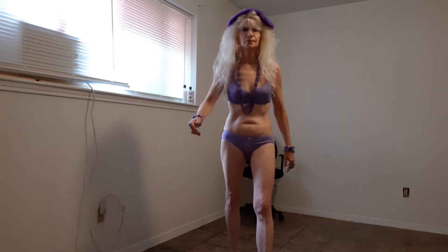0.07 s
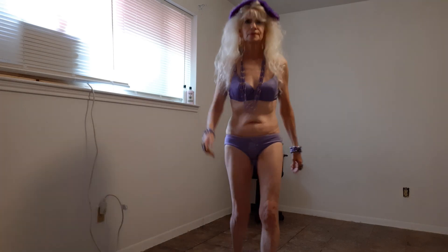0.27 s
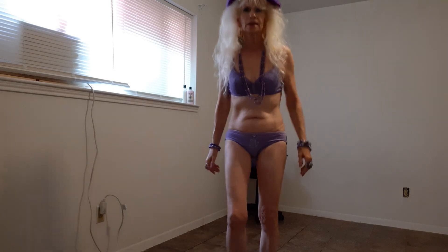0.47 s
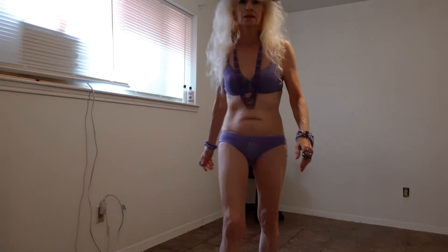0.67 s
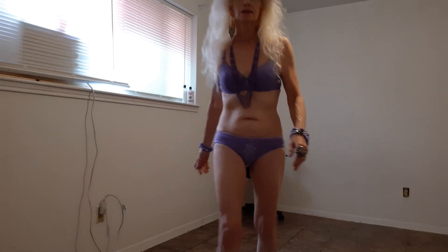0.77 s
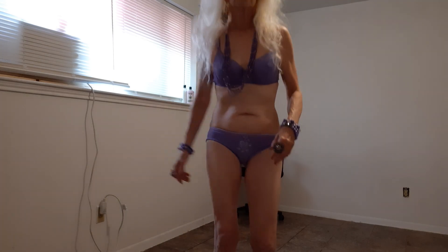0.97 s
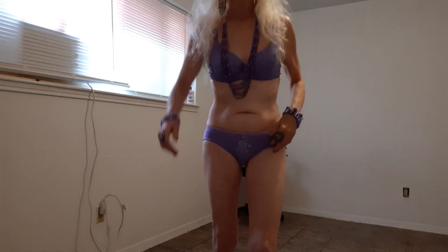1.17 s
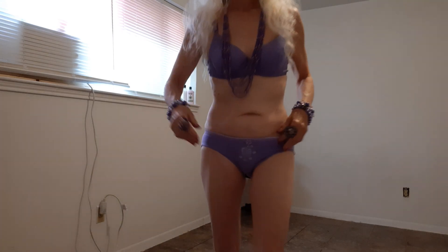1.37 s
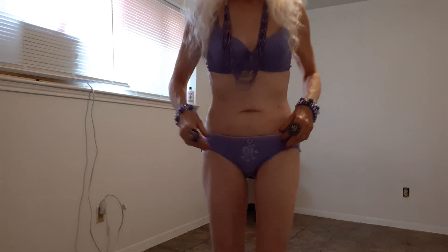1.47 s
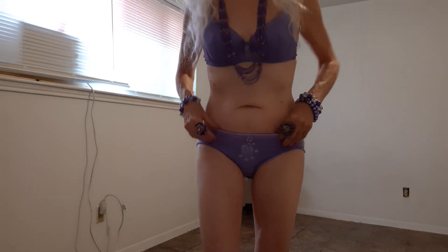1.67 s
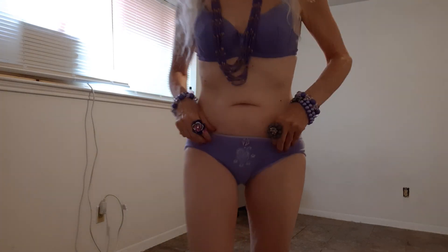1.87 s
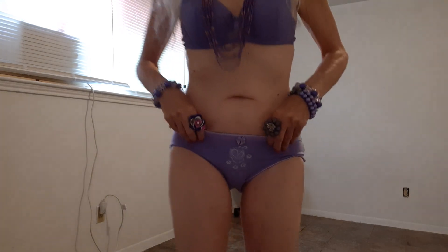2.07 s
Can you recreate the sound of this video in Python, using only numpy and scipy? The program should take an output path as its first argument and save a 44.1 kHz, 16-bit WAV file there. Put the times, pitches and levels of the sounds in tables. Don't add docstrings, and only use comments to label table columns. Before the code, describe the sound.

High-heeled footsteps on hard tile in a bare, reverberant room, the echo of an earlier step still fading at the start. Heel knocks and sole slaps cluster at 0.1-0.25 seconds, then fall near 0.5, 0.75, 1.3 and 1.9, with low thumps, hollow ringing and light scuffs. Small beads or a buckle clack and cloth rustles faintly. A quiet low machine drone and hiss continue beneath.

```python
import sys
import numpy as np
from scipy import signal
from scipy.io import wavfile

SR = 44100
rng = np.random.default_rng(int(sys.argv[2]) if len(sys.argv) > 2 else 0)


def level_to_linear(level):
    exponent = np.asarray(level, float) / 20
    return 10 ** exponent


def to_wav(s):
    ch = np.atleast_2d(s).T
    pcm = np.round(np.clip(ch, -1, 1) * 32767)
    wavfile.write(sys.argv[1], SR, pcm.astype(np.int16))


N = 92874
LEAD_S = 0.3


def rms_one(x):
    return x / np.sqrt(np.mean(x ** 2) + 1e-30)


def unit(x):
    return x / np.sqrt(np.sum(x ** 2))


def at_hz(points, hz):
    p = np.array(points)
    return np.interp(np.log(hz), np.log(p[:, 0]), p[:, 1])


def resonate(x, hz, width_hz):
    r = np.exp(-np.pi * width_hz / SR)
    gain = (1 - r * r) / 2
    return signal.lfilter([gain, 0, -gain], [1, -2 * r * np.cos(2 * np.pi * hz / SR), r * r], x + 1e-18)


def cut(x, hz, kind, order=2):
    return signal.sosfilt(signal.butter(order, hz, kind, fs=SR, output="sos"), x + 1e-18)


def banded(white, gain):
    # f/Hz, likeness (-1 opposite, 1 the same)
    likeness = [(60, 0.85), (150, 1), (300, 0.69), (600, 0.62), (1200, -0.31), (2500, -0.05),
                (8000, -0.051)]
    edges = 28 * 2 ** np.arange(0, 9.6, 0.5)
    out = 0
    for k, (low, high) in enumerate(zip(edges, edges[1:])):
        mid, side = cut(white[k % 2], [low, high], "band")
        hz = np.sqrt(low * high)
        alike = np.clip(at_hz(likeness, hz), -0.99, 0.99)
        stereo = np.sqrt(1 + alike) * mid + np.sqrt(1 - alike) * side * [[1], [-1]]
        out = out + gain(hz) * stereo
    return out


def background():
    # f/Hz, level per Hz/dB
    floor = [(40, -6.5), (130, -5), (200, -19.5), (500, -26), (1300, -59), (2600, -55.5), (9000, -47),
             (13000, -39.5)]
    # f/Hz, width/Hz, level/dB
    hum_table = [(52.2, 3.3, -68), (77.8, 3.4, -67.5), (100.3, 22, -71), (157.4, 12, -77)]
    # t/s, f/Hz, level/dB
    drone = [(0.0, 102.2, -64.5), (0.22, 117.4, -71), (0.48, 107.1, -60.5), (0.56, 121.6, -63),
             (1.11, 125.7, -59), (1.19, 109.4, -60.5), (1.41, 111.9, -64.5), (1.5, 130, -65),
             (1.59, 102.8, -85), (1.71, 133.2, -57.5), (1.94, 141, -61), (2.1, 113.8, -64.5)]
    run = N + SR // 2
    hiss = banded(rng.standard_normal((2, 2, run)), lambda hz: level_to_linear(at_hz(floor, hz)))
    hiss = rms_one(hiss[:, -N:])

    hums = 0
    for hz, width_hz, db in hum_table:
        hum = resonate(rng.standard_normal(run), hz, width_hz)
        hums = hums + level_to_linear(db) * rms_one(hum[-N:])

    s, hz, db = np.transpose(drone)
    t = np.arange(N) / SR
    turns = np.cumsum(np.interp(t, s, hz)) / SR
    tone = np.sqrt(2) * level_to_linear(np.interp(t, s, db)) * np.sin(2 * np.pi * turns)
    return level_to_linear(-63) * hiss + hums + tone


def single_click():
    click = np.zeros(int(0.15 * SR))
    click[0] = 1
    return click


def knock(db, hollow_hz, lift_db, shoulder_hz):
    # f/Hz, lift (0-3), width/Hz
    tile = [(372, 0.8, 51), (469, 0.65, 57), (627, 0.43, 30), (872, 0.69, 19), (947, 0.81, 41),
            (1110, 1.06, 13.3), (1506, 0.65, 27), (2167, 0.63, 49)]
    click = single_click()
    body = cut(click, 157, "high")
    body = cut(body, shoulder_hz, "low")
    body = cut(body, 2086, "low", order=4)
    hollow_q = 2.97
    body = body + (level_to_linear(lift_db) - 1) * resonate(body, hollow_hz, hollow_hz / hollow_q)
    for mode_hz, lift, width_hz in tile:
        body = body + lift * resonate(body, mode_hz, width_hz)
    edge = level_to_linear(-28) * cut(click, 20000, "low")
    return level_to_linear(db + 20.5) * (unit(body) + edge)


def room(sound, direct_db):
    # f/Hz, decay/s
    decay = [(100, 0.68), (200, 0.76), (350, 0.69), (600, 0.8), (1000, 0.77), (2000, 0.66), (5000, 0.52),
             (14000, 0.41)]
    tail_s, hold_s, build_s = 0.9, 0.029, 0.007
    echoes_per_s, growth_s = 900, 0.04
    t = np.arange(int(tail_s * SR)) / SR
    share = np.minimum(echoes_per_s * (1 + (t / growth_s) ** 2) / SR, 1)
    white = rng.standard_normal((2, 2, len(t)))
    echoes = white * (rng.random((2, 2, len(t))) < share) / np.sqrt(share)
    fading_s = np.hypot(t, hold_s) - hold_s
    tail = banded(echoes, lambda hz: level_to_linear(-60 * fading_s / at_hz(decay, hz)))
    tail = tail * np.sqrt(1 - np.exp(-t / build_s))
    tail = tail / np.sqrt(np.sum(tail ** 2) / 2)
    tail[:, 0] += level_to_linear(direct_db)
    return signal.fftconvolve(tail, sound[None], axes=1)


def scuff(length_s, db, treble_db):
    size = int(0.2 * SR)
    roughness_db, attack_share = 3.5, 0.21
    grains = level_to_linear(roughness_db * np.minimum(rng.exponential(1, size), 5)) * rng.standard_normal(size)
    progress = np.arange(size) / SR / length_s
    stroke = np.sqrt(np.interp(progress, [0, attack_share, 1], [0, 1, 0]))
    middle = rms_one(cut(cut(grains, 1670, "high"), 8100, "low", order=4))
    treble = rms_one(cut(cut(grains, 9700, "high", order=4), 14300, "low"))
    return level_to_linear(db + 1) * stroke * (middle + level_to_linear(treble_db) * treble)


def ping(hz, sharpness):
    width_hz = hz / sharpness
    once = resonate(single_click(), hz, width_hz)
    return unit(resonate(once, hz, width_hz))


def add(out, s, sound):
    i = int((s + LEAD_S) * SR)
    n = min(sound.shape[1], out.shape[1] - i)
    out[:, i:i + n] += sound[:, :n]


def scene():
    # t/s, level/dB, hollow f/Hz, hollow lift/dB, shoulder f/Hz (duller above)
    knocks = [(-.2, -36.5, 830, 9.5, 1170), (0.111, -42.5, 1300, 4, 1770), (.129, -33.5, 477, 5, 1060),
              (.227, -29.5, 674, 6, 873), (0.497, -33.5, 950, 14.5, 1620), (.723, -26, 1020, 6, 1250),
              (.798, -35.5, 833, 5.5, 1150), (1.294, -34.5, 410, 5.5, 765), (1.372, -34, 610, 6.5, 830),
              (1.881, -34.5, 1020, 5.5, 1110), (1.961, -37.5, 1060, 2.5, 1690)]
    # t/s, length/s, level/dB, treble over middle/dB
    scuffs = [(0.062, 0.059, -84, 22), (0.109, 0.076, -60.5, -8.5), (0.235, 0.023, -50, 3),
              (.29, 0.069, -71, -17), (0.518, 0.075, -85, 8), (0.687, 0.065, -68, -4),
              (0.628, 0.025, -68, 3.5), (0.733, 0.15, -65, -3.5), (0.809, 0.093, -73.5, 4.5),
              (1.21, 0.034, -90.5, 26.5), (1.232, .008, -85, 2.5), (1.262, 0.12, -79.5, 7.5),
              (1.333, 0.069, -69, -9), (1.356, 0.077, -61.5, 0.5), (1.449, .04, -74, 6),
              (1.554, 0.084, -83, 7.5), (1.802, 0.058, -80.5, 7.5), (1.882, 0.077, -75.5, 1),
              (1.959, 0.076, -65, -2), (2.028, 0.037, -75, 12.5)]
    # t/s, level/dB, f/Hz, sharpness Q, direct level/dB
    clacks = [(0.13, -23, 180, 3.3, -3), (0.23, -26, 195, 2.7, 2.5), (0.73, -21, 115, 3.5, -3),
              (.73, -31.5, 228, 7.2, 11), (1.29, -23.5, 173, 3.5, 0), (1.885, -25.5, 241, 5.5, -3),
              (.240, -25.5, 3940, 4.7, -12), (.242, -56, 7600, 8, -20), (0.34, -42, 8300, 3.6, -16),
              (0.51, -40.5, 4600, 2.9, -12), (.80, -36, 2200, 10, -22), (1.236, -62, 13500, 2.6, -2),
              (1.345, -39, 2500, 7.9, -26), (1.30, -32, 1470, 7.4, -24.5), (1.962, -48, 1800, 4, -20),
              (.84, -27, 1000, 1.7, -24), (0.17, -19, 465, 14, -5.5), (0.85, -43, 3800, 5.3, -24),
              (.56, -31.5, 1500, 3, -24)]
    # t/s, level/dB, f/Hz, sharpness Q
    slaps = [(.131, -16, 456, 12.5), (.2272, -20, 560, 2.4), (.2315, -18.5, 503, 2.3),
             (.243, -24, 480, 1.8), (.503, -22.5, 930, 5.4), (1.876, -29.5, 300, 2),
             (.7985, -16.5, 620, 1.56), (1.2345, -44, 14000, 7), (1.2365, -44, 12300, 6.4),
             (1.2385, -45, 14500, 7), (1.299, -28.5, 417, 1.9), (1.896, -28, 495, 2.2),
             (1.9605, -32.5, 1677, 1.9), (1.442, -24, 570, 1.9)]
    out = np.zeros((2, N + int(LEAD_S * SR)))
    for s, *how in knocks:
        add(out, s, room(knock(*how), direct_db=-18))
    for s, *how in scuffs:
        add(out, s, room(scuff(*how), direct_db=-12))
    for s, db, hz, sharpness, direct_db in clacks:
        add(out, s, room(level_to_linear(db) * ping(hz, sharpness), direct_db))
    for s, db, hz, sharpness in slaps:
        add(out, s, level_to_linear(db) * ping(hz, sharpness)[None])
    balance_db = np.array([[-1], [1]])
    return (out[:, -N:] + background()) * level_to_linear(balance_db)


def band_limit(x):
    return signal.sosfilt(signal.butter(12, 15790, fs=SR, output="sos"), x)


def record(dry):
    x = cut(dry, 39, "high", order=6)
    x = x + 0.13 * resonate(x, 4100, 470)
    x = x - 0.61 * resonate(x, 9120, 5700)
    x = x - 0.85 * resonate(x, 8550, 280)
    dip_share = 0.4
    x = (1 - dip_share) * x + dip_share * cut(x, [8310, 9730], "bandstop")
    return band_limit(x)


dry = scene()
out = record(dry)
to_wav(out)
```